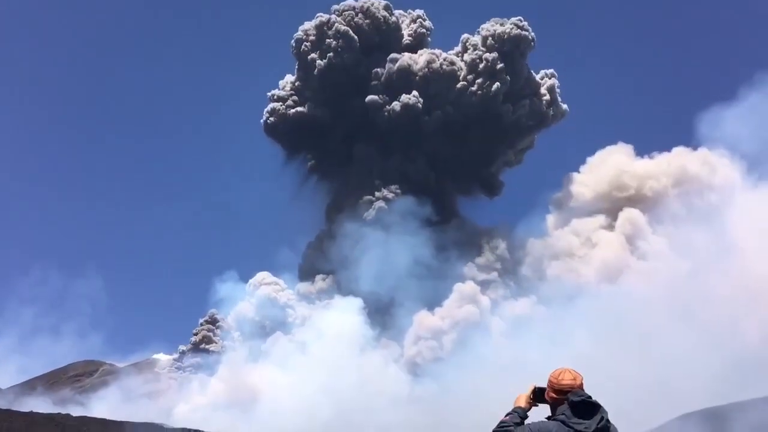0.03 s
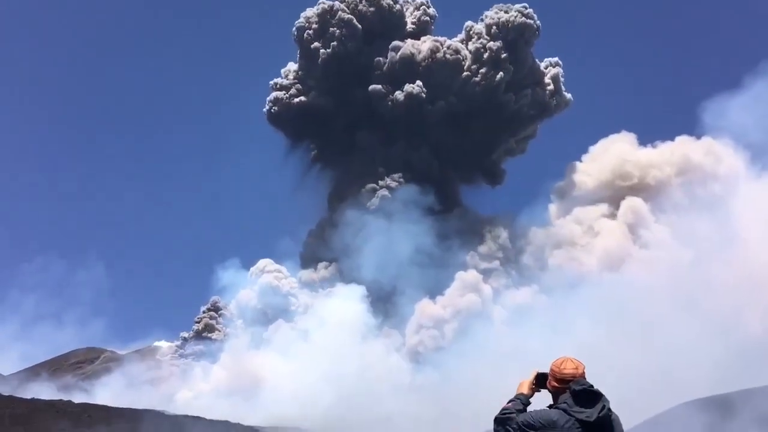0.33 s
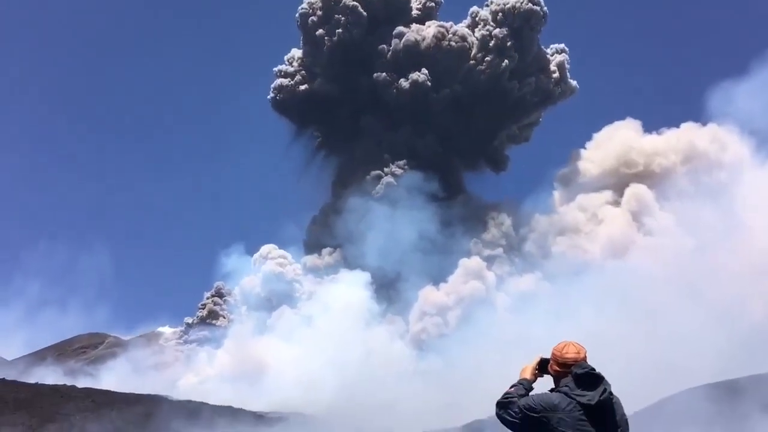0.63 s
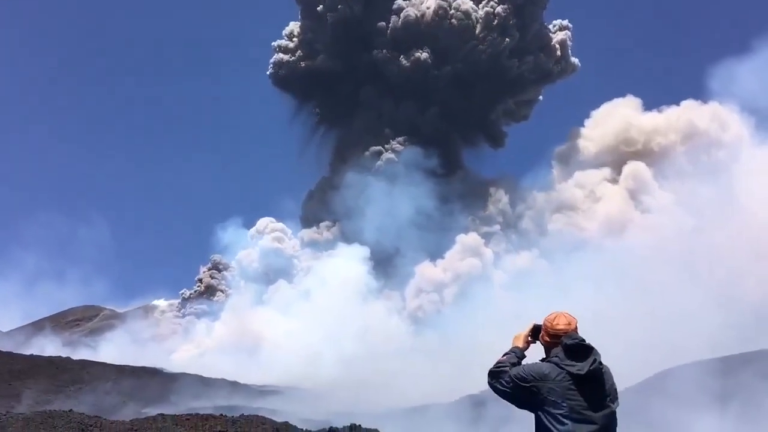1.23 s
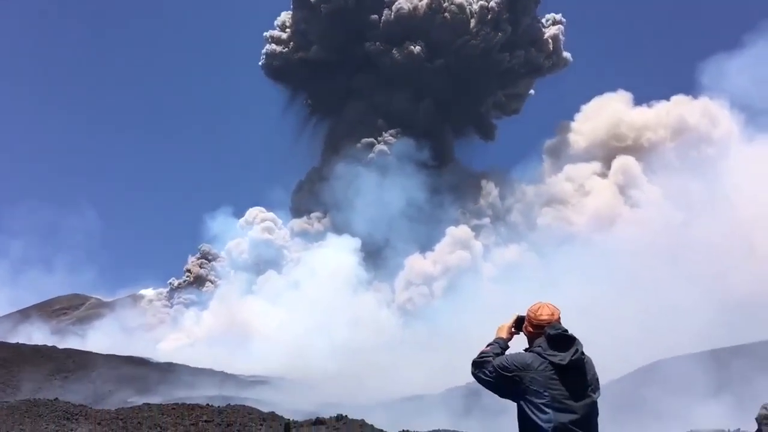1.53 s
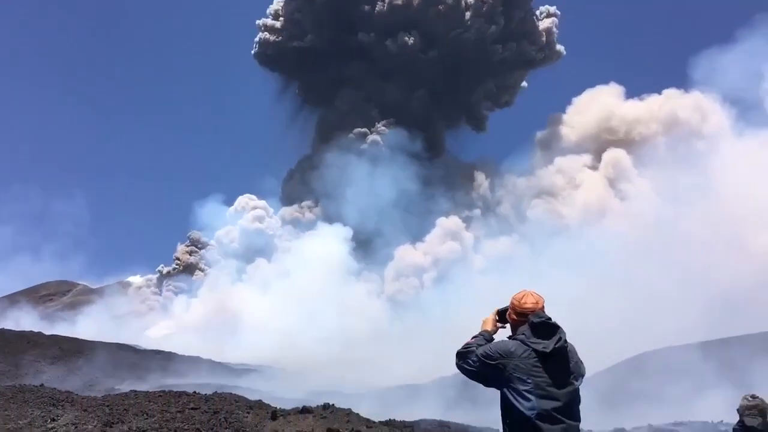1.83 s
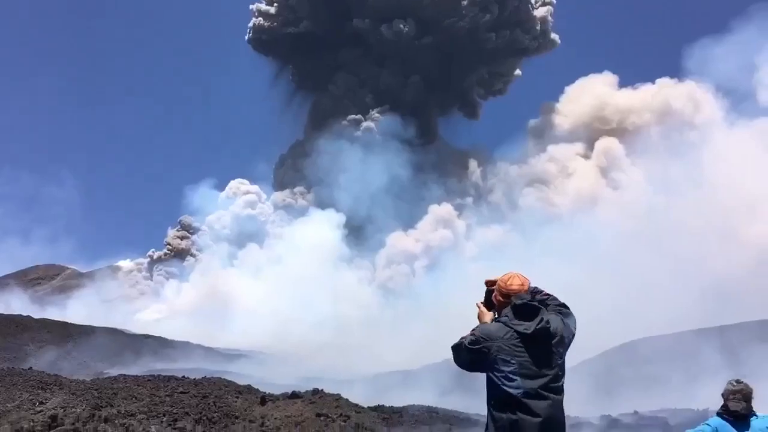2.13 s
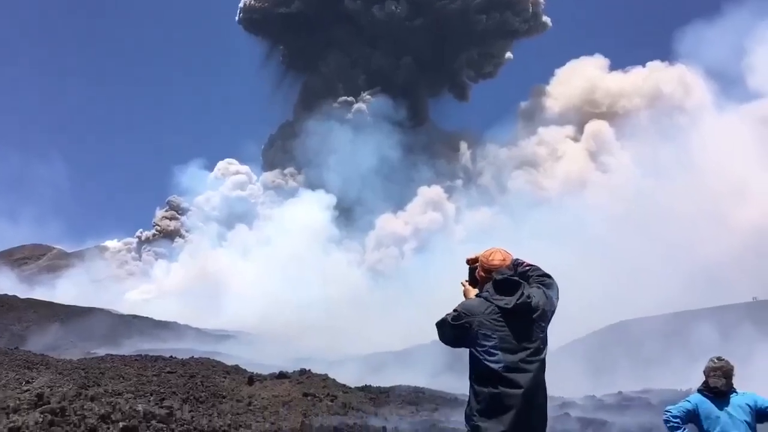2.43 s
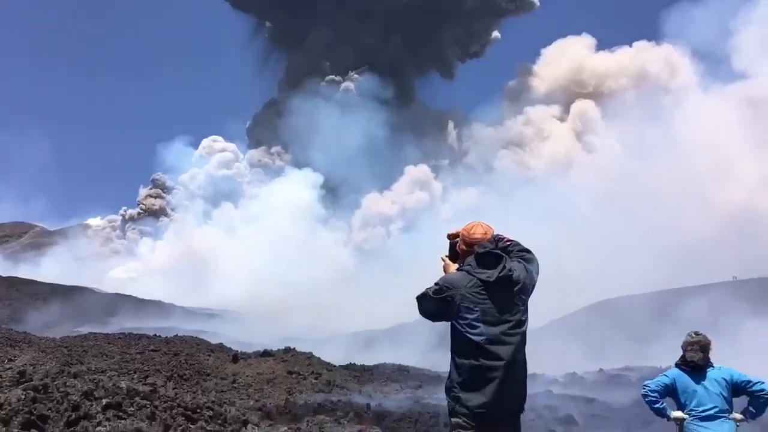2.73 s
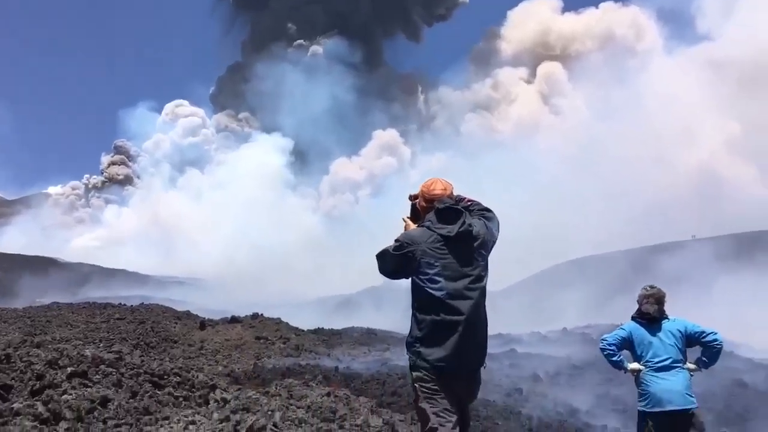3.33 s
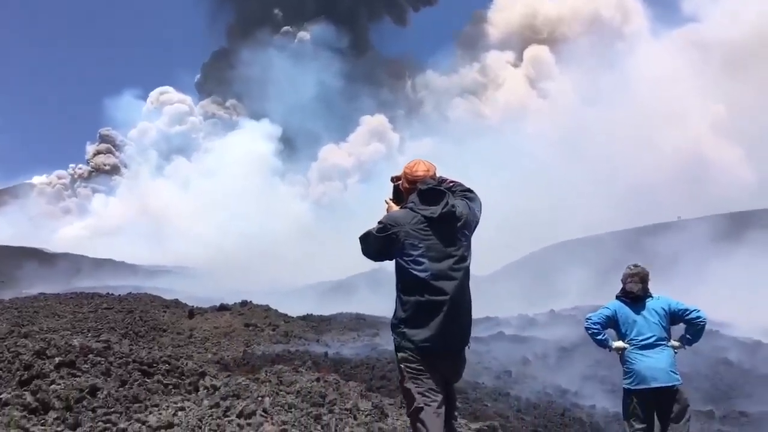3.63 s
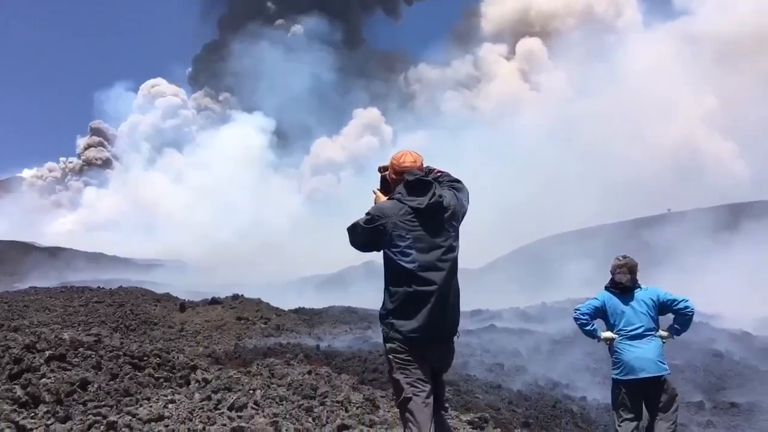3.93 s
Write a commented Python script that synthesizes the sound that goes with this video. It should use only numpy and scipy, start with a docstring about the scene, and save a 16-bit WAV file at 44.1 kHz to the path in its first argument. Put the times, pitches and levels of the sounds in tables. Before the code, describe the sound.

Uneven gusts of wind boom on the microphone outdoors on a mountain slope. A muffled volcanic roar with scattered pops continues far off, and faint ticks, often in quick pairs, sound nearby. A soft rustle comes at the end.

```python
"""Wind buffets a camera microphone on an open mountainside: eddies rumble, boom and flutter. An erupting
volcano roars far off, dulled by distance. A few dull pops stand out. Close by, a small mechanism, probably the
lens, whirs and ticks, ringing its casing, mostly in quick pairs. A faint hiss lies underneath; a soft rustle
comes in at the end."""
import sys
import numpy as np
from scipy import signal
from scipy.fft import rfft, irfft
from scipy.io import wavfile

SR = 44100
rng = np.random.default_rng(int(sys.argv[2]) if len(sys.argv) > 2 else 0)


def unload_audio(sound):
    """Save the sound as a 16-bit wav file, at the path given as the first command line argument."""
    columns = np.transpose(np.atleast_2d(sound))
    # keep every value between -1 and 1, then stretch to whole-number steps
    steps = np.round(np.clip(columns, -1, 1) * 32767)
    wavfile.write(sys.argv[1], SR, steps.astype(np.int16))


N = 176400
T = np.arange(N) / SR


def amp(db):
    """Decibels to gain."""
    return 10 ** (np.asarray(db) / 20)


def unit(x):
    """Scale to rms 1."""
    return x / np.sqrt(np.mean(x ** 2) + 1e-30)


def shape(spectrum, hz):
    """Gain of a spectrum table at hz, interpolated over log frequency."""
    table_hz, db = np.transpose(spectrum)
    return amp(np.interp(np.log(hz + 1), np.log(table_hz + 1), db))


def level(curve):
    """Per-sample gain of a level table."""
    return amp(np.interp(T, *np.transpose(curve)))


def add(mix, start_s, sound):
    """Mix a sound in at start_s."""
    part = mix[max(round(start_s * SR), 0):][:len(sound)]
    part += sound[:len(part)]


def colour(x, spectrum):
    """Filter by a spectrum table."""
    return irfft(rfft(x) * shape(spectrum, np.fft.rfftfreq(N, 1 / SR)), N)


def drift(rate_hz):
    """Random motion below rate_hz, rms 1."""
    rolloff = 1 + (np.fft.rfftfreq(N, 1 / SR) / rate_hz) ** 4
    return unit(irfft(rfft(rng.standard_normal(N)) / rolloff, N))


def noise(spectrum, churn_db, churn_hz):
    """Coloured noise of randomly churning level, rms 1."""
    churning = rng.standard_normal(N) * amp(churn_db * drift(churn_hz))
    return unit(colour(churning, spectrum))


def wind_rumble():
    """Steady wind churning at the microphone."""
    # rumble spectrum: f/Hz, level/dB
    spectrum = [(10, -30.5), (25, -13), (40, -3.5), (60, 0.5), (80, -2.5), (100, -9), (125, -7),
                (160, -14.5), (220, -19.5), (400, -33), (900, -56), (2500, -92)]
    # wind strength: t/s, level/dB
    strength = [(0, -25), (.4, -36.5), (.6, -33.5), (1.0, -31.5), (1.4, -34.5), (1.6, -33), (2.0, -32.5),
                (2.2, -31), (2.4, -34.5), (2.7, -29), (2.88, -33.5), (3.05, -27.5), (3.2, -33.5),
                (3.5, -31.5), (3.76, -31), (4, -37)]
    return level(strength) * noise(spectrum, churn_db=3.4, churn_hz=33)


def wind_buffets():
    """Eddies hit the microphone in short puffs, each a low boom plus a higher flutter."""
    # puffs: centre t/s, half-width/s, boom level/dB, flutter level/dB
    buffets = [(0.037, 0.033, -21.5, -34.5), (0.49, 0.044, -24.5, -43), (0.618, 0.067, -26, -45.5),
               (0.811, 0.052, -25.5, -37.5), (1.127, 0.043, -29, -41.5), (1.325, 0.035, -26.5, -46),
               (1.457, .035, -24.5, -38), (1.528, 0.093, -24.5, -41), (1.662, 0.031, -28.5, -47),
               (1.706, 0.028, -33.5, -34), (1.908, 0.016, -34, -34.5), (2.141, 0.054, -38.5, -33.5),
               (2.283, .09, -27, -58), (2.397, 0.013, -34, -33), (2.466, 0.041, -25, -34.5),
               (2.542, 0.02, -28, -33.5), (2.591, 0.022, -20, -30), (2.993, .035, -31, -44),
               (3.323, 0.046, -33.5, -36), (3.379, 0.041, -24, -35), (3.458, 0.045, -31, -37),
               (3.533, .045, -23, -42), (3.595, 0.032, -29, -35.5), (3.653, .04, -24, -53),
               (3.85, 0.021, -25, -35), (3.918, 0.028, -20.5, -31.5), (3.978, 0.086, -26.5, -38.5)]
    # boom spectrum: f/Hz, level/dB
    boom_spectrum = [(15, -24.5), (30, -13.5), (45, -1), (60, 2.5), (80, -5), (105, -11.5), (170, -29),
                     (400, -56), (1000, -99.5)]
    # flutter spectrum: f/Hz, level/dB
    flutter_spectrum = [(50, -29), (100, 6), (140, 2), (220, -4.5), (350, -5.5), (600, -17.5),
                        (1000, -31.5), (2000, -42), (4000, -76)]
    boom = colour(rng.standard_normal(N), boom_spectrum)
    flutter = colour(rng.standard_normal(N), flutter_spectrum)
    out = np.zeros(N)
    for centre_s, half_width_s, boom_db, flutter_db in buffets:
        swell = np.exp(-2 * ((T - centre_s) / half_width_s) ** 2)
        for eddies, db in ((boom, boom_db), (flutter, flutter_db)):
            puff = swell * eddies
            eddy_rms = np.sqrt(np.sum(puff ** 2) / np.sum(swell ** 2))
            out += amp(db) * puff / eddy_rms
    return out


def volcano_roar():
    """The eruption surges unevenly; distance dulls its treble."""
    # roar spectrum: f/Hz, level/dB
    spectrum = [(80, -19), (200, 0), (320, -1), (450, 0.5), (580, 3), (720, -5), (850, -7.5), (1000, -15.5),
                (1300, -23), (1700, -29.5), (2500, -35.5), (4000, -60), (9000, -94.5)]
    # surges: t/s, relative level/dB
    surges = [(0.0, -49), (0.01, -39), (0.11, -45.5), (0.44, -39), (0.56, -46.5), (1.09, -45.5),
              (1.14, -38.5), (1.17, -46), (2.24, -46.5), (2.54, -45), (2.74, -47.5), (2.77, -40.5),
              (2.85, -48), (3.38, -45), (3.54, -51), (3.63, -39.5), (3.65, -45.5), (4.0, -43.5)]
    return amp(db=0.5) * level(surges) * noise(spectrum, churn_db=1.23, churn_hz=34.5)


def mechanism_whir():
    """The running mechanism: a narrow noise band and a faint, wavering whine."""
    # whir spectrum: f/Hz, level/dB
    spectrum = [(800, -27), (1400, -12.5), (1700, -3.5), (1900, 1), (1990, 1.5), (2100, -3.5),
                (2400, -12.5), (2650, -15), (3200, -23), (5000, -39.5)]
    whir = noise(spectrum, churn_db=2.0, churn_hz=120)
    whine_hz = 2385 + 5 * drift(rate_hz=15)
    whine = unit(np.sin(2 * np.pi * np.cumsum(whine_hz) / SR))
    return amp(db=-65.5) * whir + amp(db=-82.5) * whine


def hiss():
    """Faint, even broadband noise."""
    # hiss spectrum: f/Hz, level/dB
    spectrum = [(1000, -3), (3500, 0), (4900, -2), (5700, 0), (8000, -0.5), (9800, -4), (10400, -14),
                (11200, -9), (12000, -15)]
    return amp(db=-76) * noise(spectrum, churn_db=0.5, churn_hz=8)


def pops():
    """Each pop is a few cycles that swell, sag in pitch and die; low ones last longer."""
    # pops and thuds: t/s, peak level/dB, mid-glide f/Hz
    events = [(.009, -28, 790), (.025, -29.5, 660), (.348, -27.5, 233), (0.351, -36, 1000),
              (.425, -31, 557), (1.119, -28, 300), (1.136, -31, 470), (1.257, -31.5, 560),
              (2.366, -34.5, 560), (2.4931, -23, 610), (2.543, -31, 750), (2.597, -33.5, 650),
              (2.782, -33, 620), (2.945, -19, 145), (2.954, -26.5, 343), (3.053, -33, 520),
              (3.303, -31, 480), (3.368, -21.5, 170), (3.593, -31.5, 593), (3.632, -32.5, 580)]
    rise_cycles, decay_cycles, glide_depth = 0.5, 1.0, 0.51
    out, t = np.zeros(N), np.arange(SR // 10) / SR
    for start_s, peak_db, mid_hz in events:
        cycles = t * mid_hz
        decay = np.exp(-cycles / decay_cycles)
        envelope = (1 - np.exp(-(cycles / rise_cycles) ** 2)) * decay
        pitch_hz = mid_hz * (1 + glide_depth * (2 * decay - 1))
        tone = np.sin(2 * np.pi * np.cumsum(pitch_hz) / SR)
        add(out, start_s, amp(peak_db) * envelope / envelope.max() * tone)
    return out


def mechanism_ticks():
    """Ticks ring the casing, many followed by a quick rebound."""
    # ticks: t/s, peak level/dB, rebound amplitude ratio
    ticks = [(.0102, -44.5, 0.1), (.1083, -45.5, 1.2), (.3015, -44.5, 0.1), (.3515, -46, 0.1),
             (.409, -48, 1), (.5985, -45.5, 0.7), (.7085, -54, 1.1), (.7925, -43, 0.2), (1.0085, -43, 1.34),
             (1.1305, -46, 0), (1.2372, -40, 0.16), (1.247, -44.5, 0.6), (1.3052, -42, 0.15),
             (1.5705, -47, 0.1), (1.6085, -42.5, 1.03), (1.8785, -43.5, 1.25), (2.1345, -44, 0.2),
             (2.2085, -52, 1.4), (2.5085, -44, 0.9), (2.6922, -38.5, 0), (2.7365, -49, 0),
             (2.8085, -42.5, 1.16), (2.9725, -59, 0.1), (3.1085, -44, 1.3), (3.3125, -43, 0.1),
             (3.3295, -50, 0.2), (3.409, -46.5, 0.9), (3.7085, -42.5, 1.04)]
    # casing response: f/Hz, level/dB
    casing = [(300, -41), (1000, -27), (1400, -9), (1700, -3.5), (1980, 5.5), (2150, -4), (2400, -10.5),
              (2700, -21.5), (3100, -23), (4000, -36), (5000, -39.5), (7000, -32.5), (9500, -34),
              (12000, -50)]
    rise_s, rebound_s, fft_size = 0.0002, 0.0046, 2048
    log_gain = np.log(shape(casing, abs(np.fft.fftfreq(fft_size, 1 / SR))))
    minimum_phase = np.exp(np.conj(signal.hilbert(log_gain)))
    ring = np.fft.ifft(minimum_phase).real[:fft_size // 2]
    ring *= 1 - np.exp(-np.arange(len(ring)) / SR / rise_s)
    ring /= abs(ring).max()
    out = np.zeros(N)
    for start_s, peak_db, rebound in ticks:
        add(out, start_s, amp(peak_db) * ring)
        add(out, start_s + rebound_s, amp(peak_db) * rebound * ring)
    return out


def rustle():
    """Soft, grainy noise near 2 kHz swells at the end."""
    # rustle spectrum: f/Hz, level/dB
    spectrum = [(600, -6.5), (1300, 9.5), (2000, 22), (2800, 7), (4000, 4), (7000, 1), (10000, -4.5),
                (12000, -10.5)]
    # swell: t/s, level/dB
    swell = [(3.8, -100), (3.86, -71), (3.908, -70), (3.925, -59), (3.96, -63), (4, -56)]
    return level(swell) * noise(spectrum, churn_db=2.5, churn_hz=150)


def scene():
    """All sources at one microphone."""
    wind = wind_rumble() + wind_buffets()
    return (wind + volcano_roar() + mechanism_whir() + hiss() + pops() + mechanism_ticks() + rustle())[None]


def record(dry):
    """The microphone sheds the deepest bass; a steep low-pass limits the treble."""
    low_cut_hz, high_cut_hz = 28, 11650
    ratio = np.fft.rfftfreq(2 * N, 1 / SR) / low_cut_hz
    highpass = ratio ** 4 / np.sqrt(1 + ratio ** 8)
    thinned = irfft(rfft(dry, 2 * N) * highpass)[:, :N]
    lowpass = signal.firwin(511, high_cut_hz, window=("kaiser", 9), fs=SR)
    return signal.oaconvolve(thinned, lowpass[None], "same")


dry = scene()
out = record(dry)
unload_audio(out)
```